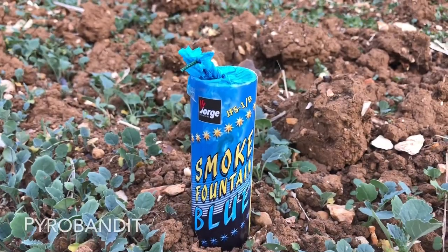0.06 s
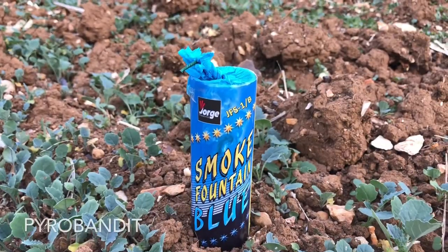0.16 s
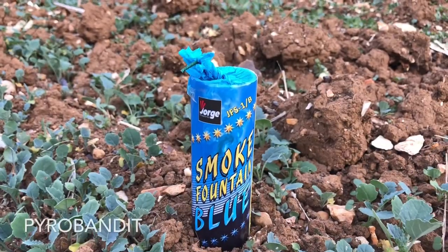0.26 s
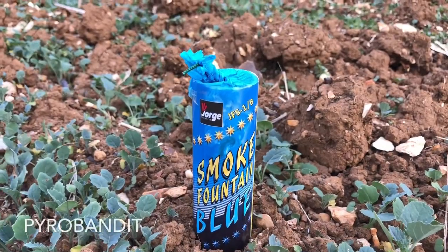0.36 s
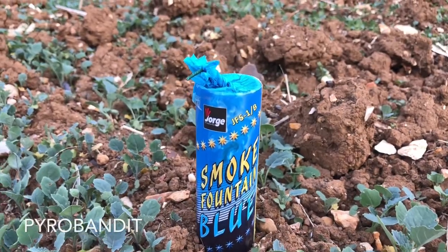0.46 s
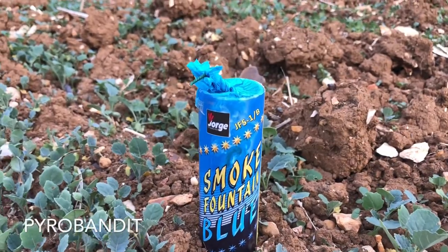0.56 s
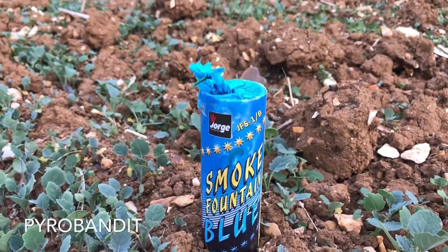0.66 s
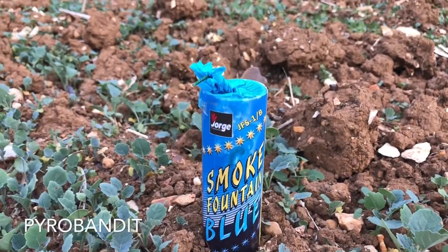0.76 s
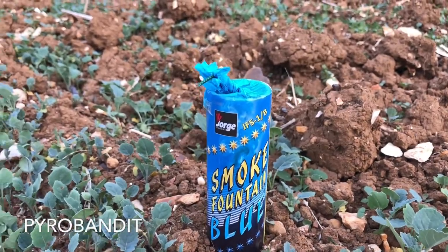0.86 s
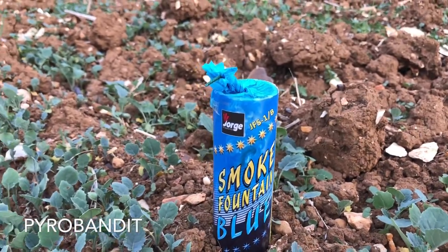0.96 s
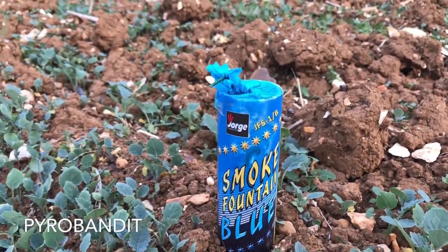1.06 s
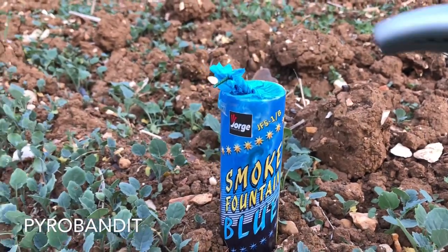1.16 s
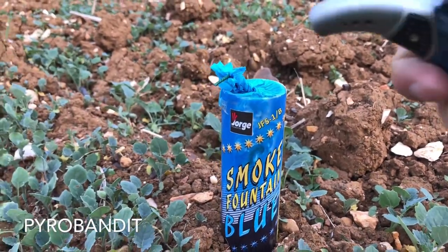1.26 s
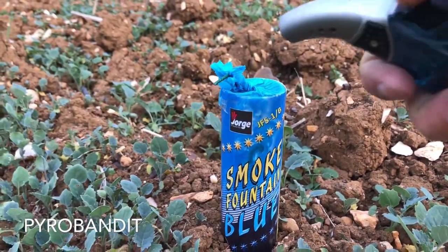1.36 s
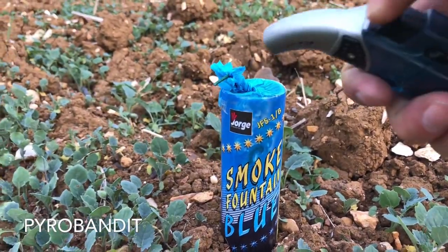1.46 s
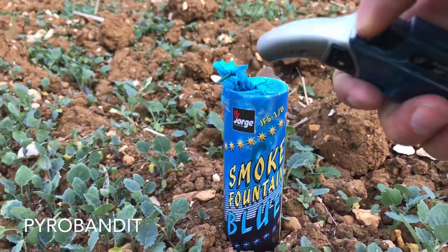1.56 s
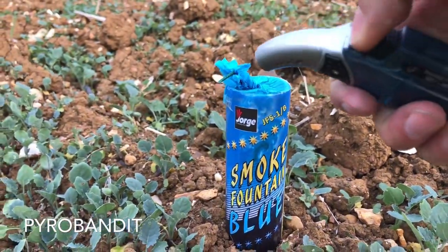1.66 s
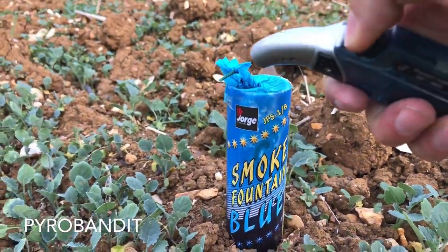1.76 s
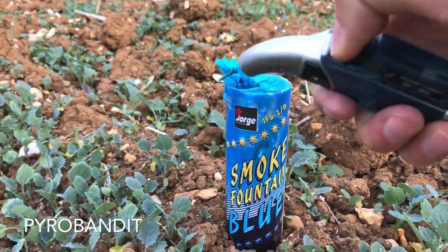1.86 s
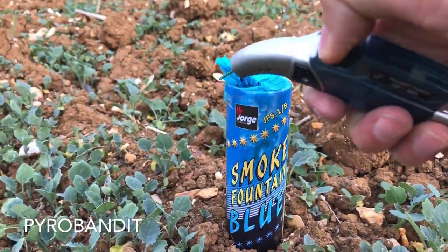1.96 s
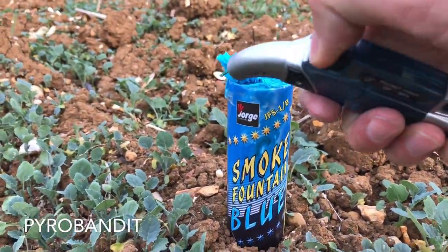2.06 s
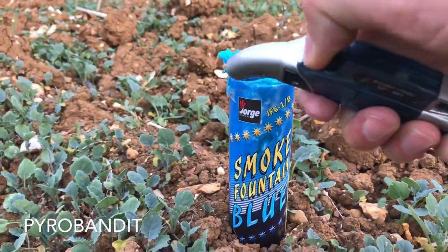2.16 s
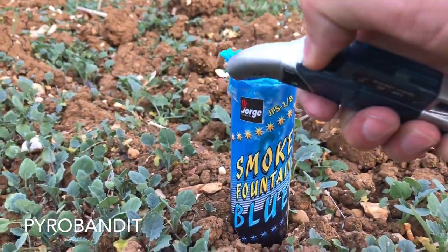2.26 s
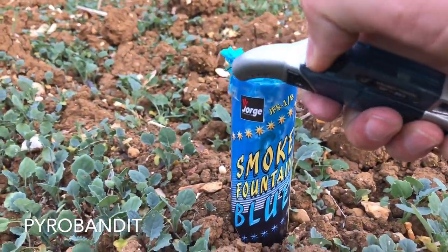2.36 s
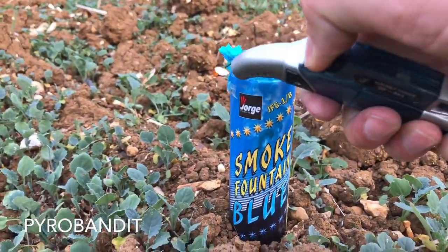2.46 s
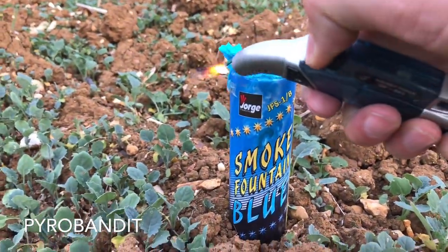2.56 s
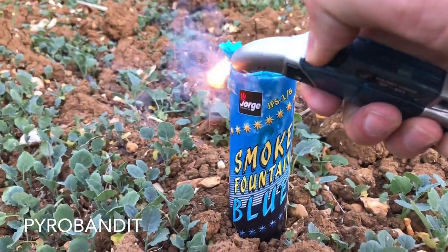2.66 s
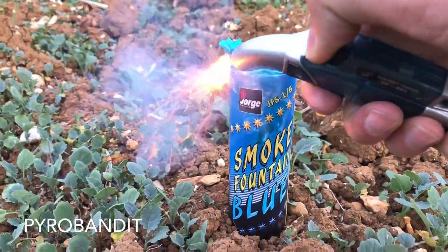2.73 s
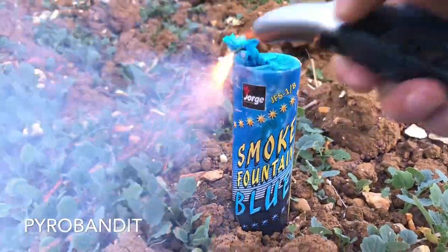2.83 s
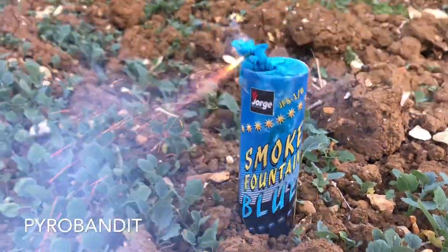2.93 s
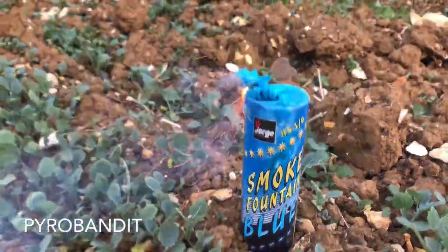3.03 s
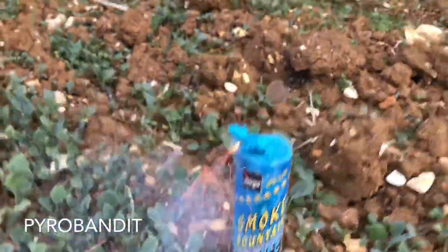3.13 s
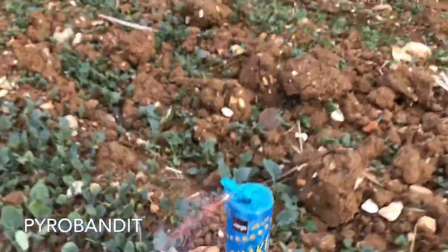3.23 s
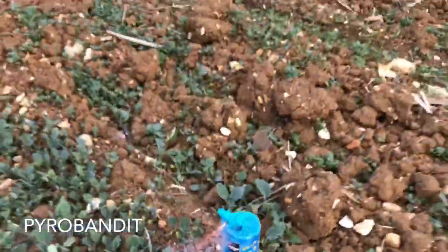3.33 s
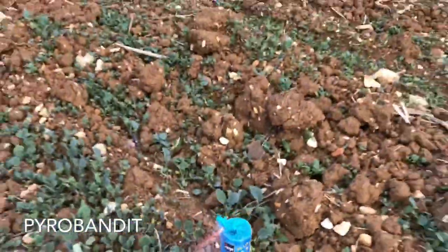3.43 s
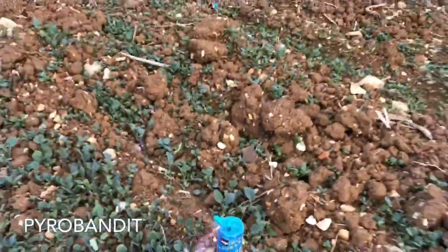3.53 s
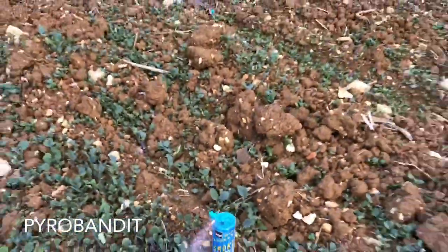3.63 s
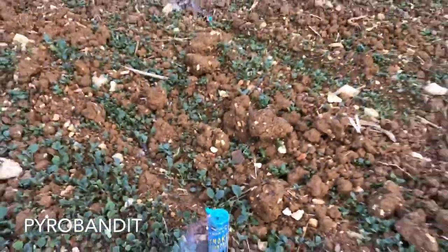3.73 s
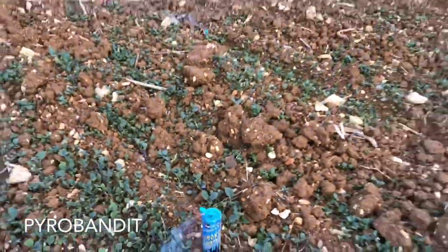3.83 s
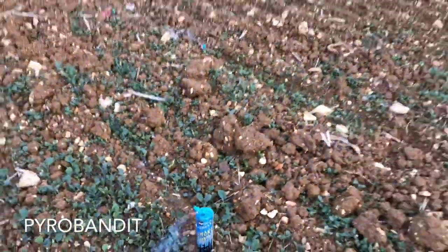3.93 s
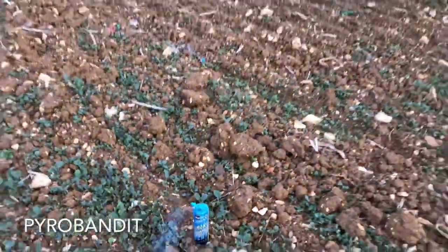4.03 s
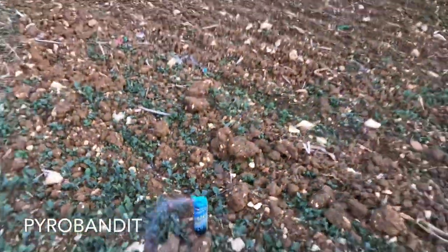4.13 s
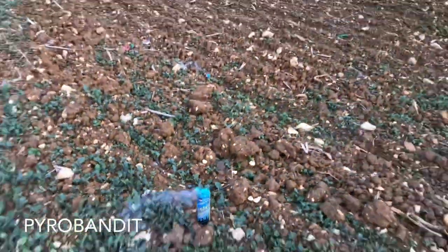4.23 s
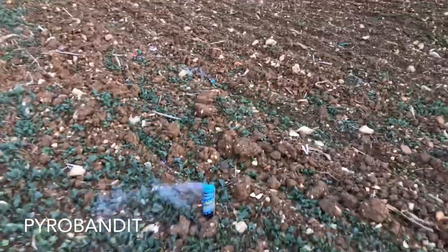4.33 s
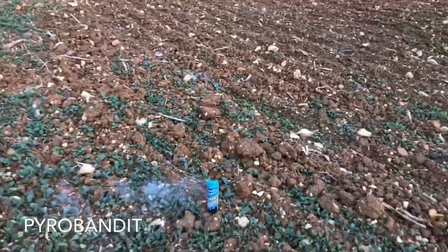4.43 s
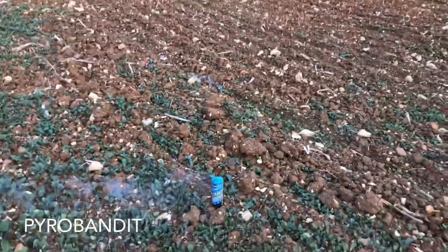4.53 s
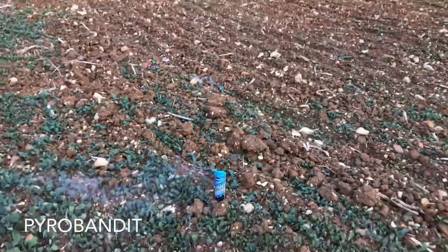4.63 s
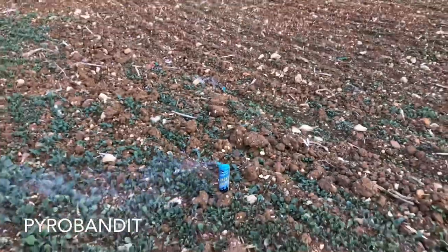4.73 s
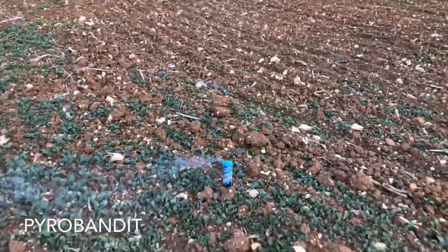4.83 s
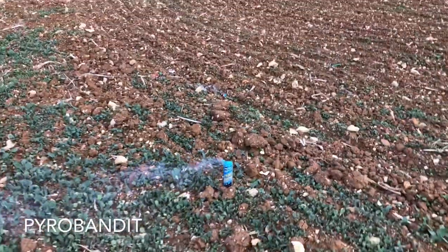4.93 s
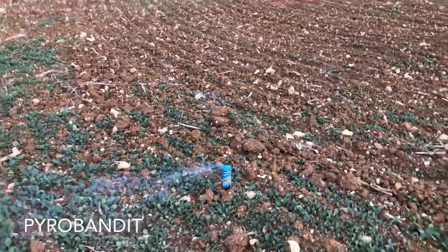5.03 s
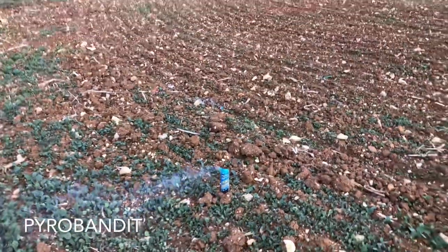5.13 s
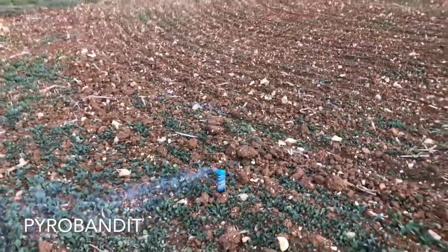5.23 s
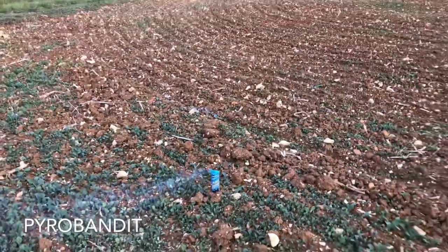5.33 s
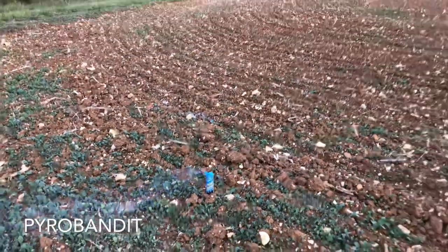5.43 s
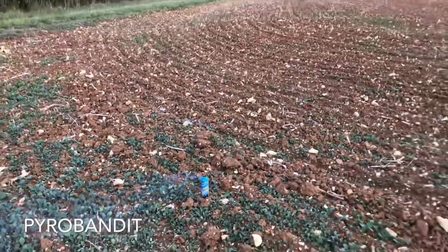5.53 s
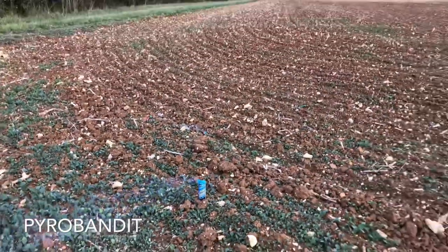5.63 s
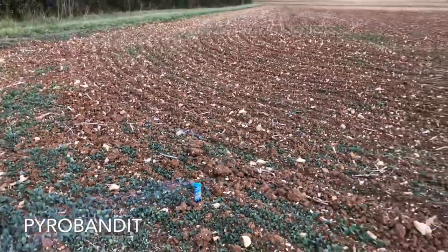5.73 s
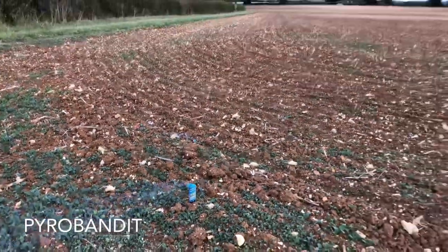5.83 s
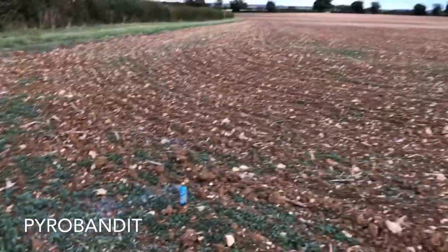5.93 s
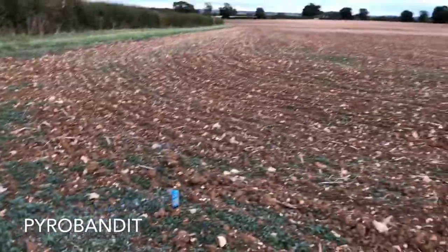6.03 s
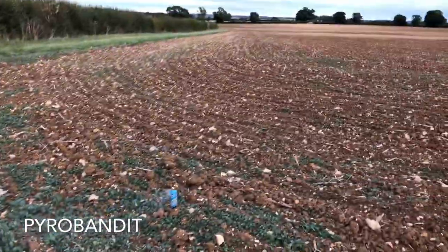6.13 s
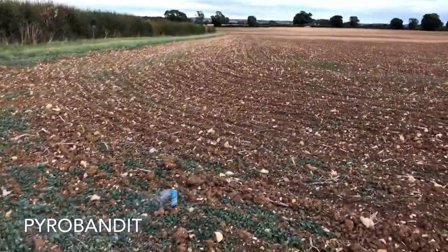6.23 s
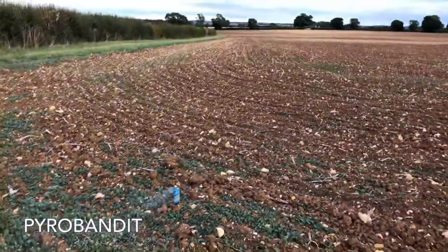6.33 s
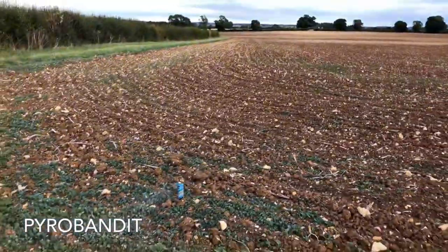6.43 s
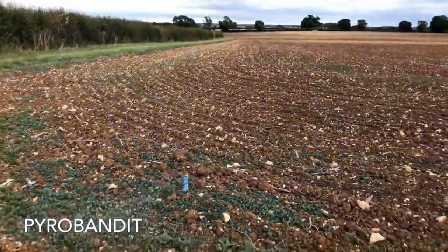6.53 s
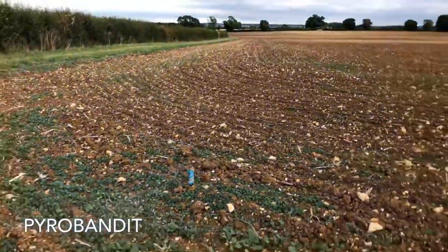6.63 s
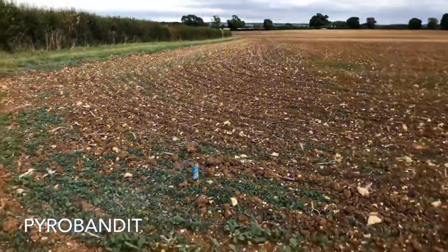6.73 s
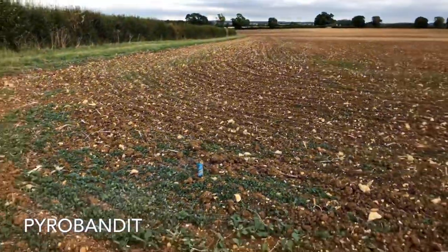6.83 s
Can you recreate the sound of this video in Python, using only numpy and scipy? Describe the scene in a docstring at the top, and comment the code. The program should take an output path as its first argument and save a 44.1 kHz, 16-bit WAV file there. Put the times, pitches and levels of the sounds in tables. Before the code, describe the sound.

A quiet field with wind buffeting the microphone. A jet lighter's trigger clicks, gas hisses, and the igniter snaps very loudly before a steady torch-like blowing. A firework fuse pops and bursts into a bright, rough fizz, then fades to a thin sputtering hiss. Soft irregular steps crumble clods and grit, with a dry crack among them. Dry outdoor sound, identical in both channels.

```python
"""An open field, where a smoke firework is lit: a jet lighter hisses, snaps and burns, then the fuse fizzes.
Gas and fire are coloured noise with crackle; their bounce off the soil sweeps as the holder backs away.
Clicks ring the lighter before the fuse catches; the tube's vent builds up while the fuse burns towards it.
Sparks and dry stalks crack as short noise bursts, and steps are dull grains on soft clods.
Wind rumbles and thumps on the single microphone throughout."""
import sys
import numpy as np
from scipy import signal
from scipy.fft import rfft, irfft, next_fast_len
from scipy.io import wavfile
from scipy.ndimage import uniform_filter1d, map_coordinates

SR = 44100
rng = np.random.default_rng(int(sys.argv[2]) if len(sys.argv) > 2 else 0)


def put_to_file(sound):
    """Save the sound as 16-bit audio at rate SR, in the file named by the first command-line argument."""
    columns = np.atleast_2d(sound).T  # one column per channel
    safe = np.clip(columns, -1, 1)
    whole_steps = np.round(safe * 32767)
    wavfile.write(sys.argv[1], SR, whole_steps.astype(np.int16))


N = 303804
TIME = np.arange(N) / SR


def undb(db):
    """Turn decibels into a gain."""
    return 10 ** (np.asarray(db) / 20)


def unit(x):
    """Scale to an average (rms) level of 1."""
    return x / np.sqrt(np.mean(x ** 2))


def ramp(start_s, rise_s):
    """0 before start_s, then straight up to 1."""
    return np.clip((TIME - start_s) / rise_s, 0, 1)


def since(s):
    """Seconds gone by since s; 0 before it."""
    return np.maximum(TIME - s, 0)


def curves(table):
    """The columns of a table, joined by straight lines in time."""
    s, *columns = np.transpose(table)
    return [np.interp(TIME, s, column) for column in columns]


def shape(x, points):
    """Filter by a frequency response given as points of pitch (Hz) and level (dB)."""
    hz, db = np.transpose(points)
    size = next_fast_len(len(x))
    f = np.maximum(np.fft.rfftfreq(size, 1 / SR), 1)
    gain = undb(np.interp(np.log(f), np.log(hz), db))
    return irfft(rfft(x, size) * gain, size)[:len(x)]


def colour(x, points):
    """Filter x by the points, then scale it to rms 1."""
    return unit(shape(x, points))


def band(x, lo_hz, hi_hz, order=2):
    """Keep the band between two frequencies."""
    edges = [lo_hz, min(hi_hz, .45 * SR)]
    sos = signal.butter(order, edges, "bandpass", fs=SR, output="sos")
    return signal.sosfilt(sos, x)


def walk(rate):
    """Random levels, a new one about rate times a second, joined by slopes; rms 1."""
    k = max(int(SR / rate), 1)
    steps = np.repeat(rng.standard_normal(N // k + 1), k)
    return unit(uniform_filter1d(steps, k)[:N])


def grains(size, rate, spread_db):
    """Random single-sample ticks, rate a second on average, a few much larger than the rest."""
    hit = rng.random(size) < rate / SR
    sign = rng.choice([-1, 1], size)
    return hit * sign * undb(spread_db * np.minimum(rng.exponential(size=size), 5))


def burning(crackle):
    """Smooth gas noise with the fine crackle of burning grains; rms 1."""
    gas = rng.standard_normal(N)
    return unit(gas + crackle * unit(grains(N, rate=4000, spread_db=2.5)))


def add(out, s, x):
    """Mix x into out at s seconds."""
    i = max(int(s * SR), 0)
    out[i:i + len(x)] += x[:max(N - i, 0)]


def fuse():
    """Powder burns unevenly: a roar from the flare, a hiss of gas and a sizzle of sparks sputter together."""
    # how hard the fuse burns: time_s [s], level_db [dB]
    burn_levels = [(2.56, -46), (2.71, -45.5), (2.81, -47.5), (3.04, -36.5), (3.48, -39), (3.75, -46),
                   (4.01, -43.5), (4.38, -51.5), (4.47, -48.5), (4.78, -46), (4.93, -52.5), (5.12, -54),
                   (5.17, -49.5), (5.29, -53.5), (5.47, -48.5), (5.54, -53.5), (6.0, -52.5), (6.2, -58.5),
                   (6.42, -60.5), (6.47, -55), (6.83, -54.5)]
    # colours of the three parts: pitch_hz [Hz], level_db [dB]
    roar_colour = [(50, -19), (200, 0), (700, -3.5), (2000, -2.5), (3200, -7), (5000, -6.5), (9000, -45)]
    hiss_colour = [(700, -11.5), (2000, -4.5), (3200, -0.5), (4300, -4), (6600, -1.5), (8500, -5),
                   (12000, -23.5)]
    sizzle_colour = [(4000, -54), (7000, -10.5), (9000, 1.5), (12000, 2), (14000, 4), (15500, 2)]
    # the tip catches, then the powder core is lit, then the fire burns into the tube
    tip_lit_s, tip_rise_s, core_lit_s, core_rise_s = 2.51, 0.21, 2.74, 0.26
    in_tube_s, tube_fade_s = 6.0, 0.071
    # a flare swells to its loudest and dies away
    flare_s, flare_db, flare_rise_db_per_s, flare_fall_db_per_s = 2.939, -34, 48, 56

    burn_db = curves(burn_levels)[0]
    age = since(core_lit_s)
    in_tube = ramp(in_tube_s, tube_fade_s)
    before_flare = flare_rise_db_per_s * (flare_s - TIME)
    after_flare = flare_fall_db_per_s * (TIME - flare_s)
    flare = undb(flare_db - np.maximum(before_flare, after_flare))
    # as the fuse shortens, the roar gains and the hiss thins; inside the tube the gas hisses more
    roar_db = burn_db - 8 + 1.02 * age
    hiss_db = burn_db + 2 - 2 * age + 3.5 * in_tube
    # sparks are held back until the core burns, and again inside the tube
    muffle_db = -2.5 * (1 - ramp(core_lit_s, core_rise_s)) - 5 * in_tube
    roar = colour(burning(crackle=0.18), roar_colour) * np.hypot(flare, undb(roar_db))
    hiss = colour(burning(crackle=0.6), hiss_colour) * undb(hiss_db)
    sizzle = colour(burning(crackle=0.47), sizzle_colour) * undb(burn_db + 1.5 + muffle_db)
    sputter = undb(1.0 * walk(70) + 1.02 * walk(16))
    return (roar + hiss + sizzle) * ramp(tip_lit_s, tip_rise_s) * sputter


def vent():
    """Gas blows through the broad resonance of the tube's mouth; it builds up, then holds."""
    # colour of the mouth: pitch_hz [Hz], level_db [dB]
    vent_colour = [(1200, -51), (2300, -12.5), (3350, 3), (3950, 0.5), (4600, -1), (6000, -11), (9000, -24)]
    start_s, rise_s, level_db = 3.9, 2.15, -56.5
    gas = colour(burning(crackle=0.29), vent_colour)
    return gas * ramp(start_s, rise_s) * undb(level_db + 2.3 * walk(40))


def lighter_jet():
    """Gas hisses from the nozzle; once lit, a fluttering jet flame takes over and scorches the wrapper."""
    # how loud the jet flame is: time_s [s], level_db [dB]
    flame_levels = [(1.86, -49), (2.08, -44.5), (2.3, -42.5), (2.5, -47), (2.9, -46.5)]
    # colours of unlit gas and flame: pitch_hz [Hz], level_db [dB]
    gas_colour = [(1500, -13), (3000, -14), (5800, -12), (8100, 6.5), (9300, -4), (10500, -14),
                  (12000, -13), (13300, -1), (14300, -7), (15500, 5)]
    flame_colour = [(60, -15), (250, -5.5), (900, -3), (1500, 1), (2500, -1), (3200, -3), (4200, -2),
                    (5100, -10), (6200, -12), (9500, -14), (12000, -19.5), (16000, -6)]
    # the valve opens, the spark lights the gas, the trigger is let go
    valve_s, valve_attack_s, lit_s, lit_attack_s = 1.635, .02, 1.803, 0.0098
    off_s, off_release_s, scorch_rise_s = 3, 0.17, .17
    # levels, and how fast each fades once the gas is lit
    gas_db, gas_fade_db_per_s = -50, 43
    roar_db, roar_fade_db_per_s = -46, 13
    scorch_db, scorch_fade_db_per_s = -55.5, 15

    age = since(lit_s)
    gas = colour(rng.standard_normal(N), gas_colour) * undb(gas_db - gas_fade_db_per_s * age)
    flame = colour(burning(crackle=.3), flame_colour) * undb(curves(flame_levels)[0])
    roar = unit(band(rng.standard_normal(N), 180, 1750))
    roar = roar * undb(roar_db - roar_fade_db_per_s * age)
    # the wrapper heats up and crackles
    scorch = unit(band(grains(N, rate=1100, spread_db=6.5), 4800, 7700))
    scorch = scorch * undb(scorch_db - scorch_fade_db_per_s * age)
    flutter = undb(0.72 * walk(90))
    fire = (flame + roar) * flutter * ramp(lit_s, lit_attack_s) + scorch * ramp(lit_s, scorch_rise_s)
    return (gas + fire) * ramp(valve_s, valve_attack_s) * (1 - ramp(off_s, off_release_s))


def over_soil(x):
    """Direct sound plus its later bounce off the ground: the two cancel at pitches that move with the lag."""
    # bounce off the soil as the microphone moves: time_s [s], lag_s [s], share [0-1]
    ground = [(1.85, .00055, .58), (2.15, .000535, .62), (2.5, .00046, .65), (2.95, .000465, .48),
              (3.35, .00063, .25), (4.0, .00063, .3), (4.3, .00054, .4), (5.05, .00042, .38),
              (5.95, .000378, .33), (6.35, .00032, .1)]
    # what the rough soil sends back: pitch_hz [Hz], level_db [dB]
    soil_colour = [(1200, -22), (2300, -11), (3200, -4), (4400, 0), (5600, 0), (7000, -5), (11000, -5.5),
                   (16000, -7)]
    lag, strength = curves(ground)
    bounce = map_coordinates(shape(x, soil_colour), [(TIME - lag) * SR], order=5)
    return x + strength * bounce


def lighter_clicks(travel_s=0.00053, scatter_db=-36, scatter_t60=0.056):
    """The trigger and the igniter's hammer ring the plastic body; the clods around scatter a faint tail."""
    # trigger and igniter: start_s [s], level_db [dB], brightness [dB per octave]
    clicks = [(1.4695, -31, -3), (1.7145, -45, 3.5), (1.774, -34, 2.5), (1.787, -35, 2), (1.797, -2, 3),
              (1.822, -33, 4)]
    # ringing of the plastic body: pitch_hz [Hz], level_db [dB], time to full swing [s]
    body_modes = [(1700, 0.5, 0.0011), (1890, -9, 0.00092), (3130, -3, 0.00052), (4360, -5, 0.00086),
                  (5180, 0.5, 0.00034), (6560, 2, 0.00054), (8300, -11.5, 0.00085), (9760, -12.5, 0.00057),
                  (11500, -2.5, 0.00012), (12400, -17, 0.00046), (14800, -13, 0.00034)]
    out, t = np.zeros(N), TIME[:SR // 20]
    for s, db, tilt_db in clicks:
        ring = 0
        for hz, mode_db, swing_s in body_modes:
            ratio = hz / body_modes[0][0]
            age = np.maximum(t - travel_s / np.sqrt(ratio), 0)  # high bending waves arrive first
            swell = age / swing_s * np.exp(1 - age / swing_s)
            gain = undb(mode_db + tilt_db * np.log2(ratio))
            ring = ring + gain * swell * np.sin(2 * np.pi * hz * age)
        scatter = unit(band(rng.standard_normal(len(t)), 1200, 10000))
        scatter = scatter * undb(scatter_db - 60 * t / scatter_t60)
        add(out, s, undb(db) * (ring / np.abs(ring).max() + scatter))
    return out


def snaps(t60=0.0079):
    """Sparks pop and dry stalks snap: short broad cracks of fading noise, each with a sharp front."""
    # pops and snaps: start_s [s], peak_db [dB], lowest_hz [Hz], highest_hz [Hz]
    cracks = [(2.9252, -11.5, 4200, 10000), (4.012, -32, 1400, 3500), (4.024, -30, 2000, 9000),
              (4.0372, -16, 4000, 15000)]
    out, t = np.zeros(N), TIME[:SR // 40]
    for s, db, lo_hz, hi_hz in cracks:
        burst = rng.standard_normal(len(t)) * undb(-60 * t / t60)
        burst[0] += 4  # the sharp front
        crack = band(burst, lo_hz, hi_hz, order=1)
        add(out, s, undb(db) * crack / np.abs(crack).max())
    return out


def footsteps(lumpy_db=2.1, heel_attack_s=0.0045, heel_s=0.014):
    """The heel lands, then the sole rolls on and clods give way in lumps: dull grains with ticks of dry grit."""
    # steps and scuffs on soft soil: start_s [s], heel_db [dB], sole_db [dB],
    # time until full weight [s], crumb pitch_hz [Hz], dry grit_db [dB against the dull grains]
    treads = [(3.545, -40, -69, 0.025, 450, -19), (4.021, -45.5, -48, 0.046, 375, -13),
              (4.244, -46, -76, .03, 790, -5), (4.66, -34.5, -46, 0.07, 442, -23),
              (4.829, -52, -53, 0.048, 500, -8), (5.201, -41.5, -53.5, 0.042, 432, -12),
              (5.292, -41.5, -48.5, 0.064, 410, -15), (5.529, -52, -51.5, 0.053, 460, -4.5),
              (5.769, -46, -44, 0.039, 555, -10), (5.858, -36.5, -52.5, 0.03, 674, -7),
              (6.108, -59, -54, 0.032, 595, -15), (6.577, -34.5, -56.5, 0.055, 333, -29)]
    out, t = np.zeros(N), TIME[:SR // 2]
    for s, heel_db, sole_db, weight_s, hz, grit_db in treads:
        heel = undb(heel_db) * np.exp(-(t / heel_s) ** 2)
        lumps = undb(sole_db + lumpy_db * walk(71.6)[:len(t)])
        sole = lumps * np.exp(-((t - weight_s) / weight_s) ** 2)
        thud = unit(band(grains(len(t), rate=2000, spread_db=2.5), hz / 4.25, hz * 1.07))
        grit = unit(band(grains(len(t), rate=500, spread_db=6), hz * 1.72, hz * 3.0))
        attack = 1 - np.exp(-t / heel_attack_s)
        add(out, s, attack * (heel + sole) * (thud + undb(grit_db) * grit))
    return out


def rustles():
    """Soft uneven brushes of noise, from hand and sleeve, as the lighter is brought forward."""
    # hand and sleeve brushing: middle_s [s], level_db [dB], half length_s [s], pitch_hz [Hz]
    brushes = [(1.095, -72, .05, 9000), (1.14, -70, .05, 1700), (1.305, -68, .014, 4500),
               (1.37, -68, .08, 2200)]
    out = np.zeros(N)
    for s, db, length, hz in brushes:
        brush = unit(band(burning(crackle=0.91), hz / 2.0, hz * 1.07, order=1))
        out += undb(db) * np.exp(-((TIME - s) / length) ** 2) * brush
    return out * undb(2 * walk(79))


def wind(rest_hz=50, fall_s=0.0096, swell_s=0.0087, eddy_db=-3.0, rumble_db=-2, steep=0.037):
    """Gusts rumble on the microphone over a light breeze; each eddy is a thump that sinks in pitch as it passes."""
    # gusts, before rumble_db is added: middle_s [s], level_db [dB], half length_s [s]
    gust_table = [(0.0, -44, 0.02), (0.13, -42, 0.085), (0.372, -53, .15), (0.557, -47, 0.04),
                  (0.716, -44.5, 0.072), (0.954, -43, 0.084), (1.07, -39.5, 0.04), (1.266, -48, 0.049),
                  (1.61, -43, 0.091), (1.812, -42, 0.085), (2.116, -47.5, 0.047), (2.26, -48.5, .05),
                  (2.953, -55, 0.46), (3.454, -47.5, 0.14), (3.67, -46, .06), (3.823, -46.5, 0.043),
                  (4.723, -54, 0.09), (5.328, -53, 0.035), (5.524, -49, .04), (5.88, -48, .035),
                  (6.304, -46, 0.022), (6.546, -46, 0.056), (6.828, -38, 0.076)]
    # the strongest single eddies, before eddy_db is added: start_s [s], level_db [dB], starting pitch_hz [Hz]
    eddies = [(0.099, -35, 297), (0.185, -33.5, 250), (0.639, -33.5, 258), (0.715, -37, 220),
              (0.943, -29.5, 255), (1.012, -36, 266), (1.051, -35.5, 167), (1.087, -33.5, 335),
              (1.244, -36.5, 300), (1.557, -34, 212), (1.697, -35, 370), (2.297, -35.5, 354),
              (3.239, -30.5, 363), (3.334, -34, 240), (3.411, -32.5, 242), (3.497, -25.5, 403),
              (3.643, -31, 282), (3.695, -36.5, 322), (6.293, -40, 231), (6.525, -34.5, 266),
              (6.817, -28.5, 293), (6.852, -31, 396)]
    # colour of the rumble: pitch_hz [Hz], level_db [dB]
    wind_colour = [(20, -36), (35, -11), (55, 2), (110, -2), (170, -5.5), (260, -18), (400, -27.5),
                   (800, -85), (3000, -64)]
    breeze = undb(-62.5)  # between the gusts, before rumble_db
    gusts = sum(undb(db) * np.exp(-((TIME - s) / length) ** 2) for s, db, length in gust_table)
    rumble = colour(rng.standard_normal(N), wind_colour)
    out = rumble * np.hypot(gusts, breeze) * undb(rumble_db + 0.5 * walk(27))
    t = TIME[:SR // 8]
    for s, db, start_hz in eddies:
        hz = rest_hz + (start_hz - rest_hz) * np.exp(-t / fall_s)
        phase = 2 * np.pi * (np.cumsum(hz) / SR + rng.random())
        swell = t / swell_s * np.exp(1 - t / swell_s)
        front = steep * np.exp(-t / 0.016) * np.sin(2 * phase)  # the leading edge is steeper than the wake
        add(out, s, undb(db + eddy_db) * swell * (np.sin(phase) + front))
    return out


def field():
    """Faint, nearly steady air over the open land, made of coloured noise."""
    # colour of the open air: pitch_hz [Hz], level_db [dB]
    field_colour = [(25, -7), (60, 0), (150, 5.5), (350, -3.5), (550, -7.5), (750, -13), (1150, -11),
                    (1550, -13.5), (2500, -21), (5000, -22.5), (10000, -30), (16000, -33)]
    level_db = -62
    return colour(rng.standard_normal(N), field_colour) * undb(level_db + .5 * walk(7.1))


def scene():
    """All sources at one microphone, the same in both channels."""
    hissing = over_soil(fuse() + vent() + lighter_jet())
    handling = lighter_clicks() + rustles()
    mono = hissing + handling + snaps() + footsteps() + wind() + field()
    return np.array([mono, mono])


def record(dry):
    """The recorder steeply cuts everything above top_hz."""
    top_hz = 15780
    sos = signal.ellip(12, .1, 80, top_hz, fs=SR, output="sos")
    return signal.sosfilt(sos, dry)


dry = scene()
out = record(dry)
put_to_file(out)
```